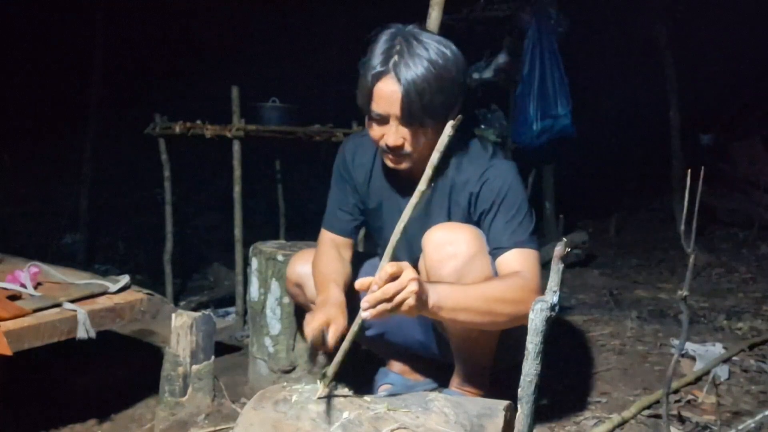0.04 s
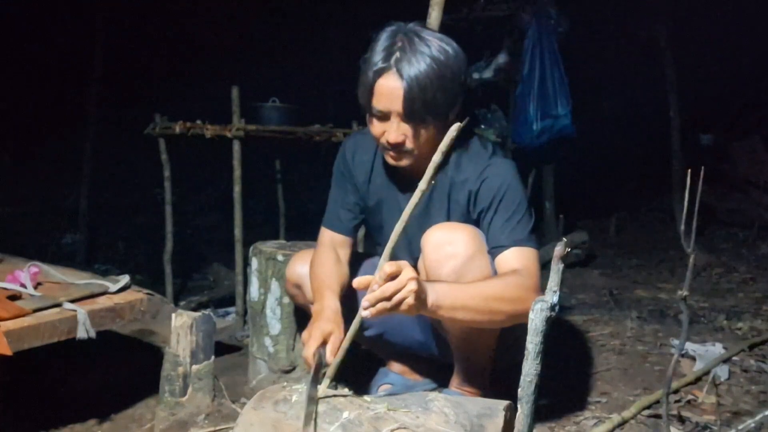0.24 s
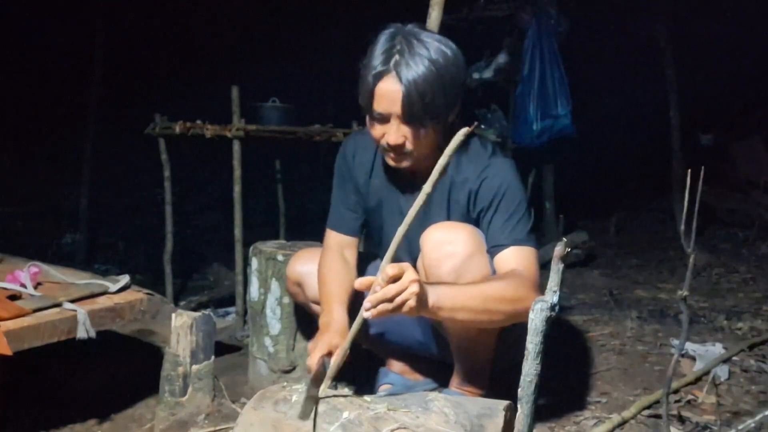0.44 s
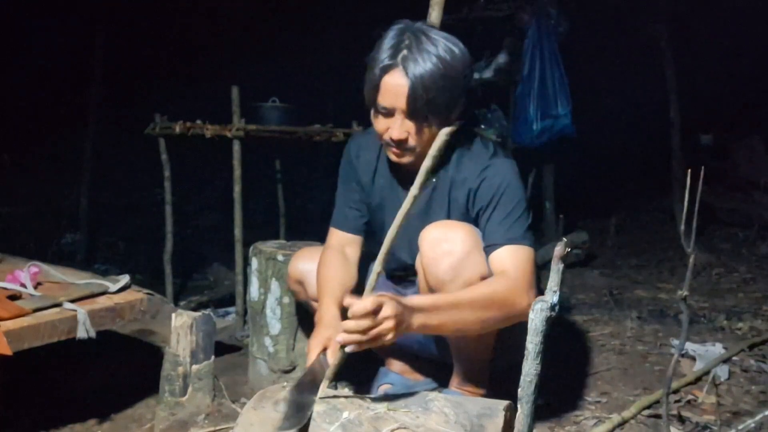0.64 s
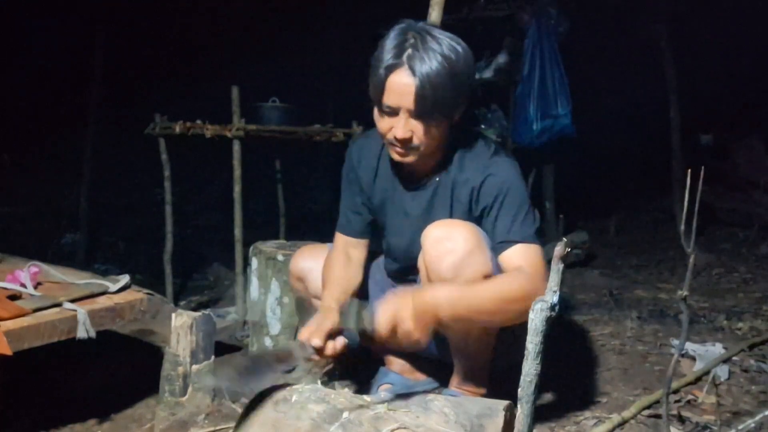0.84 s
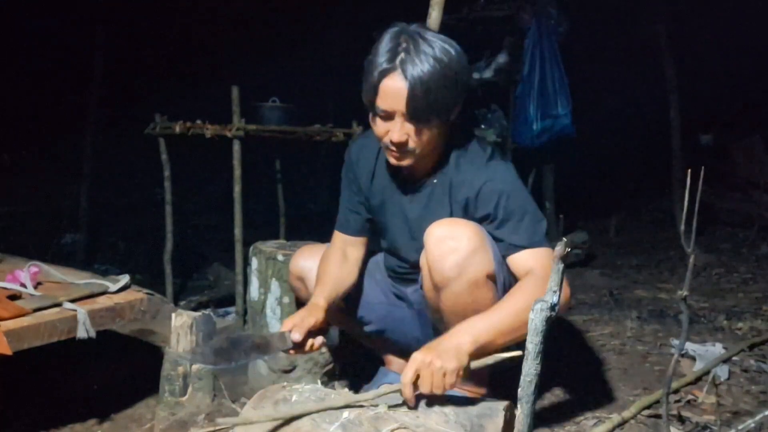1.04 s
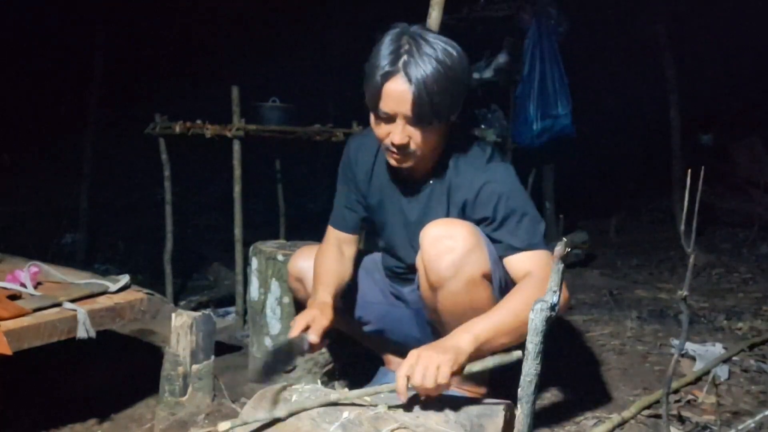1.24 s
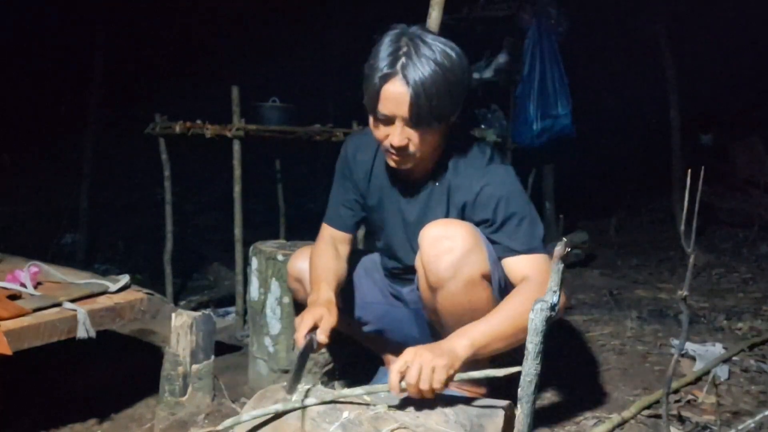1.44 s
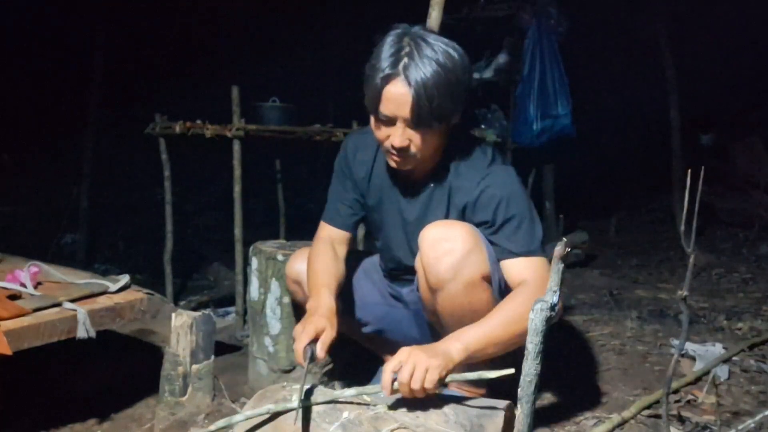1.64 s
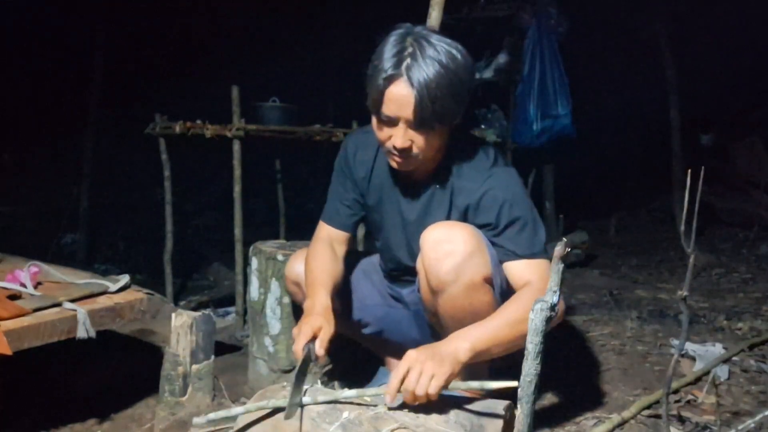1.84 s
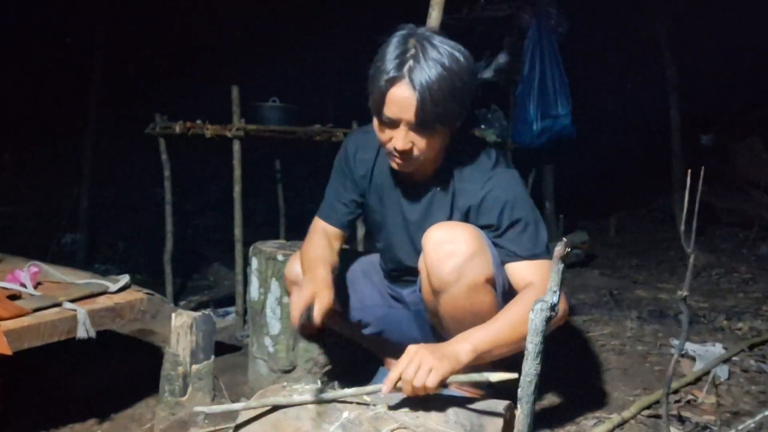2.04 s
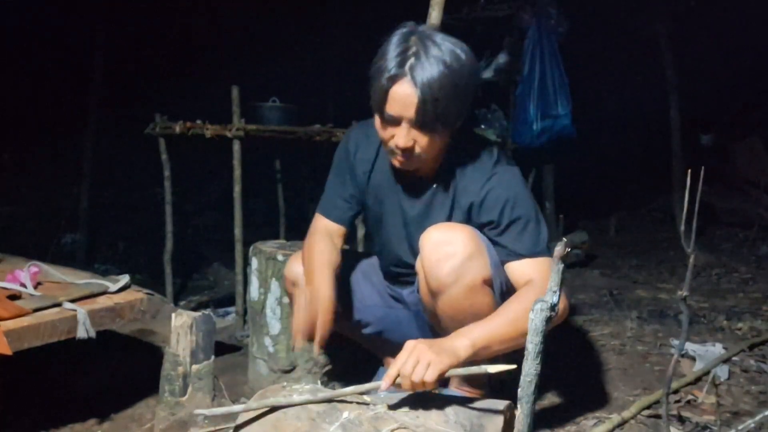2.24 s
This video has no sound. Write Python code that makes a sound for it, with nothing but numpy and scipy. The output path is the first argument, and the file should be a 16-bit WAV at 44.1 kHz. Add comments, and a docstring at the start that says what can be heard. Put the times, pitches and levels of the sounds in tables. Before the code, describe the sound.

A machete chops through a thin stick on a wooden block at about 0.2 and 0.5 seconds, close in front, each blow a sharp crack with a knock and low thud. A very faint gritty tick follows near 0.8 seconds and a clearer one near 1.7. Throughout the roughly 2.3 seconds, quieter crickets chirp, trill and buzz all around over soft night air and a low rumble.

```python
"""Outdoors at night: a machete chops twice through a thin stick on a wooden block.
The edge crunches through the fibres, knocks on the block and shakes the ground; two light ticks
follow as the stick is moved. Field crickets chirp with their wings, a higher cricket trills and
bush crickets rasp and buzz, all around, over night air and a low rumble."""
import sys
import numpy as np
from scipy import signal
from scipy.fft import rfft, irfft
from scipy.io import wavfile
from scipy.ndimage import uniform_filter1d

SR = 44100
rng = np.random.default_rng(int(sys.argv[2]) if len(sys.argv) > 2 else 0)


def master(y):
    """Save y as 16-bit WAV."""
    cut = np.clip(np.atleast_2d(y).T, -1, 1)
    pcm = np.round(cut * 32767)  # scale
    wavfile.write(sys.argv[1], SR, pcm.astype(np.int16))


N = 101429
TIME = np.arange(N) / SR

# level of the distant field crickets: time_s, level_db
CHORUS_LEVEL = [(0, -39), (.15, -38.5), (.3, -38), (.41, -41), (.52, -33), (.6, -49), (.67, -46),
                (.76, -39), (.87, -35.5), (1.2, -35.5), (1.65, -34.5), (1.98, -37.5), (2.12, -34),
                (2.3, -36)]
STROKES_PER_S, STROKE_FALL = 25, 0.138  # field cricket wings; fall as a fraction of pitch
BACKGROUND_PAN_DB = 2.5


def from_db(db):
    """Decibels to gain."""
    return 10 ** (np.asarray(db) / 20)


def pan(db):
    """Stereo gains; positive is left."""
    return from_db(np.array([[db], [-db]]) / 2)


def curve(rows):
    """Gain along rows of time_s, level_db."""
    return from_db(np.interp(TIME, *np.transpose(rows)))


def decay(start_s, t60_s):
    """Exponential decay from start_s."""
    return (TIME >= start_s) * from_db(-60 * np.maximum(TIME - start_s, 0) / t60_s)


def flicker(rate_hz):
    """Smooth random drift, spread about 1."""
    knots = rng.standard_normal(400)
    return np.interp(TIME * rate_hz, np.arange(len(knots)), knots)


def noise(spectrum):
    """Stereo noise, rms 1, from rows of freq_hz, density_db; alike in the bass, diffuse in the treble."""
    # left-right likeness: freq_hz, correlation
    likeness = [(50, 0.95), (300, 0.84), (1000, -0.11), (2500, 0.22), (4700, -0.34), (8000, 0.019),
                (15000, -0.18)]
    f = np.fft.rfftfreq(N, 1 / SR) + 1
    hz, db = np.transpose(spectrum)
    gain = from_db(np.interp(np.log(f), np.log(hz), db, left=-np.inf, right=-np.inf))
    alike = np.clip(np.interp(f, *np.transpose(likeness)), -1, 1)
    mid, side = rfft(rng.standard_normal((2, N)))
    x = irfft(gain * (np.sqrt(1 + alike) * mid + np.sqrt(1 - alike) * side * [[1], [-1]]), N)
    return x / x.std()


def ring(start_s, hz, db, t60_s):
    """One struck mode."""
    return -from_db(db) * decay(start_s, t60_s) * np.sin(2 * np.pi * hz * (TIME - start_s))


def among_trees(x, echo_db, t60_s):
    """Diffuse echoes from trunks and leaves, different at each ear; overall level is kept."""
    t = TIME[:SR // 2]
    echoes = rng.standard_normal((2, len(t))) * from_db(-60 * t / t60_s)
    echoes /= np.sqrt(np.sum(echoes ** 2, axis=1, keepdims=True))
    wet = from_db(echo_db)
    return (x + wet * signal.fftconvolve(x, echoes, axes=1)[:, :N]) / np.hypot(1, wet)


def night_air():
    """Soft hiss over a low rumble that swells and sinks."""
    # spectra: freq_hz, density_db
    air = [(90, -7), (160, 1.5), (280, -2), (450, -12), (800, -17.5), (1500, -22), (2600, -25), (3200, -30),
           (16000, -41)]
    rumble = [(22, -61), (35, -23), (50, -0.5), (70, -0.5), (110, -9), (170, -19), (300, -51)]
    # envelopes: time_s, level_db
    air_level = [(0, -48.5), (.65, -47), (.9, -45.5), (1.2, -45), (1.6, -45.5), (2.0, -45.5), (2.3, -45.5)]
    rumble_level = [(0, -40), (.35, -34), (.65, -35), (.85, -40.5), (1.05, -36), (1.22, -35), (1.5, -39),
                    (1.6, -36.5), (1.82, -32.5), (1.92, -40.5), (2.3, -35)]
    return (noise(air) * curve(air_level) + noise(rumble) * curve(rumble_level)) * pan(BACKGROUND_PAN_DB)


def field_crickets():
    """Each wing stroke is a falling whistle with a thin third harmonic; a few strokes make a chirp."""
    # near chirps: start_s, strokes, centre_hz, level_db, pan_db
    chirps = [(0.0, 2, 4850, -37, 4), (0.228, 4, 4700, -35.5, 2), (0.451, 4, 4750, -38, -1),
              (0.747, 4, 4600, -30, 5), (0.955, 4, 4800, -29.5, -2), (1.18, 3, 4850, -36.5, -7),
              (1.268, 4, 4650, -30.5, 3), (1.438, 4, 4650, -37, -16), (1.585, 4, 4850, -37.5, -13),
              (1.734, 3, 4550, -33, 6), (1.875, 2, 4900, -36, -12), (2.011, 3, 4600, -30.5, 7.5),
              (2.10, 4, 4800, -30.5, -4)]
    stroke_s = 0.0313
    out = np.zeros((2, N))
    for start_s, strokes, centre_hz, level_db, pan_db in chirps:
        for k, (late, sharp, loud) in enumerate(rng.standard_normal((int(round(strokes)), 3))):
            progress = (TIME - start_s - k / STROKES_PER_S - 0.0016 * late) / stroke_s
            on = (progress > 0) & (progress < 1)
            stroke = progress[on]
            hz = centre_hz * (1 + 0.01137 * sharp - STROKE_FALL * (stroke - .5))
            phase = 2 * np.pi * np.cumsum(hz) / SR
            whistle = np.sin(phase) + from_db(-25) * np.sin(3 * phase)
            out[:, on] += pan(pan_db) * from_db(level_db + 1.3 * loud) * np.sin(np.pi * stroke) * whistle
    return out


def far_field_crickets():
    """The same kind further off, each with its own pitch, pace and place."""
    singers, centre_hz, chirps_per_s = 12, 4543, 4.9
    out = np.zeros((2, N))
    for pitch, (pace, offset, side) in zip(np.linspace(-1, 1, singers), rng.uniform(-1, 1, (singers, 3))):
        stroke = (TIME * STROKES_PER_S * (1 + .1 * pace) + offset) % 1
        hz = centre_hz * (1 + .07 * pitch + 0.016 * flicker(18) - STROKE_FALL * (stroke - .5))
        whistle = np.sin(2 * np.pi * np.cumsum(hz) / SR)
        chirp_cycles = TIME * chirps_per_s * (1 + 0.247 * pace) + offset
        chirping = np.clip(0.1 + np.sin(2 * np.pi * chirp_cycles), 0, 1)
        out += pan(BACKGROUND_PAN_DB + 7 * side) * chirping * np.sin(np.pi * stroke) * whistle
    return out / out.std() * curve(CHORUS_LEVEL) * from_db(-0.5)


def shimmer():
    """The crickets' overtones, as a high band of noise."""
    # spectrum: freq_hz, density_db
    overtones = [(10500, -20), (12700, -12), (13700, 1), (14800, -2), (16000, -12)]
    # envelope: time_s, level_db
    level = [(0, -53), (.15, -73), (.3, -64), (.42, -64), (.52, -57), (.66, -74), (.79, -49), (.89, -69),
             (1.05, -50), (1.13, -65), (1.38, -56), (1.47, -61), (1.66, -59), (1.8, -52), (1.98, -69),
             (2.15, -56), (2.3, -65)]
    return noise(overtones) * curve(level)


def far_insects():
    """Distant field crickets, trills and bush crickets rasping in the trees merge into throbbing bands."""
    # spectra: freq_hz, density_db
    chorus_band = [(3000, -56), (3350, -28), (3700, -16), (4300, -2.5), (4720, -0.5), (5050, -6),
                   (5400, -14), (6200, -27.5), (9000, -26), (11000, -39.5), (16000, -33)]
    trill_band = [(5400, -45), (5700, 15), (5830, 11.5), (5960, 19.5), (6080, -35), (6400, -61)]
    rasp_band = [(5800, -55), (6400, -19), (7100, -7.5), (7850, 5), (8200, -1.5), (8600, -30), (10500, -37),
                 (16000, -22)]
    chorus = noise(chorus_band) * curve(CHORUS_LEVEL) * from_db(2 * flicker(49.75))
    trills = noise(trill_band) * from_db(-45 + 2 * flicker(65.6))
    rasp = noise(rasp_band) * from_db(-47.5 + 2.3 * flicker(14.76) + 0.63 * flicker(160))
    return (chorus + trills) * pan(BACKGROUND_PAN_DB) + rasp * pan(5.2)


def trilling_cricket():
    """A higher cricket on the left: nearly pure, uneven pulses that swell and fade in each chirp."""
    # chirps: middle_s, level_db
    chirps = [(0.22, -46.5), (0.46, -39), (0.68, -41), (0.9, -40), (1.13, -40.5), (1.35, -37.5),
              (1.70, -38.5), (1.91, -39.5), (2.12, -39.5)]
    pitch_hz, glide_hz, waver_hz = 5827, 72, 26.4
    pulses_per_s, chirp_s, uneven_db = 32.3, 0.17, 3
    stroke = TIME * pulses_per_s % 1
    hz = pitch_hz + glide_hz * (.5 - stroke) + waver_hz * flicker(68)
    pulses = np.sin(2 * np.pi * np.cumsum(hz) / SR) * np.sin(np.pi * stroke)
    swell = sum(from_db(db) * np.cos(np.pi * np.clip((TIME - s) / chirp_s, -.5, .5)) for s, db in chirps)
    return pan(23.5) * pulses * swell * from_db(uneven_db * flicker(40.42))


def chops():
    """The edge crunches through the stick; block, stick and ground ring; trees scatter the crack."""
    # edge meets block: hit_s, level_db, cutting_s, crunch_db, crack_db, stick_hz, stick_db
    blows = [(0.2155, -2, 0.0052, -23, -14, 910, -12.5), (0.5454, -3, 0.0098, -21, -18, 1225, -14)]
    # crunching fibres: freq_hz, density_db
    fibre_spectrum = [(300, 16), (2000, 11), (5000, -1), (9000, 16), (12000, 4), (16000, 9)]
    # splitting wood: centre_hz, level_db, t60_s, scatter_db
    crack_bands = [(476, -6.5, 0.063, -26.5), (757, -1.5, 0.064, -21), (1310, -3, 0.037, -27.5),
                   (2220, -1, 0.064, -27.5), (4370, 3.5, 0.034, -22.5), (8650, -32, 0.048, -33),
                   (13400, -1, 0.013, -31)]
    # low modes of block and ground: freq_hz, level_db, t60_s
    ground_modes = [(60.5, -7.5, 0.12), (86.4, 0.5, 0.059), (122.1, -14.5, 0.19)]
    snap_lead_s, ground_lag_s, ground_rise_s = 0.0014, 0.0046, 0.016
    fibres = noise(fibre_spectrum)
    bands = [(noise([(hz / 2, -20), (hz, 0), (hz * 2, -20)]), *rest) for hz, *rest in crack_bands]
    out = np.zeros((2, N))
    for hit_s, level_db, cutting_s, crunch_db, crack_db, stick_hz, stick_db in blows:
        bite = from_db(crunch_db + 3.3 * np.clip((TIME - hit_s) / cutting_s, -1, 0))
        snap = from_db(1.5) * decay(hit_s - snap_lead_s, t60_s=0.039)  # the last fibres part
        crunch = fibres * bite * (TIME > hit_s - cutting_s) * ((TIME < hit_s) + snap)
        knock = block(hit_s) + ring(hit_s, stick_hz, stick_db, t60_s=0.066)
        swell = np.clip((TIME - hit_s - ground_lag_s) / ground_rise_s, 0, 1)
        thud = swell * sum(ring(hit_s + ground_lag_s, *mode) for mode in ground_modes)
        scatter = from_db(-15) * decay(hit_s, t60_s=0.42)
        crack = sum(band * (from_db(crack_db + db) * decay(hit_s, t60_s) + from_db(scatter_db) * scatter)
                    for band, db, t60_s, scatter_db in bands)
        out += from_db(level_db) * (crunch + knock + thud + crack)
    return out * pan(3)


def block(hit_s):
    """The block's knock; its modes build up while the edge is in contact."""
    # block modes: freq_hz, level_db, t60_s, pan_db
    modes = [(275, -19, .08, -2), (543, -27, 0.1, -6), (598, -7.5, 0.042, -6.5), (630, -4.5, 0.04, 7),
             (760, -24, .045, 12), (990, -10.5, 0.024, 9), (1221, -7.5, 0.027, -2), (1410, -18.5, .04, -8),
             (1610, -26.5, 0.048, 31), (1778, -21.5, 0.068, 0), (1930, -19.5, 0.036, 16),
             (2200, -23, 0.075, 5)]
    contact_s = 0.00042
    rise = np.clip((TIME - hit_s) / contact_s, 0, 1)
    return rise * sum(ring(hit_s, hz, db, t60_s) * pan(pan_db) for hz, db, t60_s, pan_db in modes)


def bush_cricket():
    """Short, very high buzzes on the right, each leaving a faint echo."""
    # buzzes: start_s, length_s, level_db
    buzzes = [(0.412, .115, -53.5), (1.565, .11, -49.5)]
    # spectrum: freq_hz, density_db
    buzz_band = [(8300, -33), (9100, 11), (9550, 13), (9900, -5), (10300, -33)]
    level = np.zeros(N)
    for start_s, length_s, level_db in buzzes:
        on = (TIME > start_s) * (TIME < start_s + length_s)
        echo = from_db(-6) * decay(start_s + length_s, t60_s=0.95)
        level += from_db(level_db) * (on + echo)
    return noise(buzz_band) * uniform_filter1d(level, size=400) * from_db(2 * flicker(90)) * pan(-7)


def ticks():
    """Light, gritty touches of stick and blade that also stir the block."""
    # touches: start_s, grit_db, t60_s, knock_db
    touches = [(0.78, -47.5, 0.43, -64), (1.708, -38, 0.14, -40.5)]
    # spectrum: freq_hz, density_db
    grit_spectrum = [(200, 1), (600, 9), (1300, -15), (3000, -4), (8000, 7.5), (16000, -3)]
    grit = noise(grit_spectrum) * from_db(3.3 * flicker(169.8))
    return sum(from_db(grit_db) * decay(start_s, t60_s) * grit + from_db(knock_db) * block(start_s)
               for start_s, grit_db, t60_s, knock_db in touches)


def scene():
    """Chopping in front, insects and night air all around."""
    air = night_air()
    near = among_trees(field_crickets(), echo_db=-2, t60_s=0.1)
    far = among_trees(far_field_crickets(), echo_db=13.5, t60_s=0.1) + shimmer()
    trill = among_trees(trilling_cricket(), echo_db=7.5, t60_s=0.12)
    chopping = among_trees(chops(), echo_db=-24.5, t60_s=0.22)
    return chopping + ticks() + near + far + trill + far_insects() + bush_cricket() + air


def record(dry):
    """Cuts the deepest bass, rounds the loudest peaks, cuts the top."""
    low_hz, high_hz = 34, 15900
    x = signal.sosfilt(signal.butter(3, low_hz, "high", fs=SR, output="sos"), dry)
    rounded = x / (1 + x ** 4) ** (1 / 4)
    return signal.sosfilt(signal.ellip(12, .1, 90, high_hz, fs=SR, output="sos"), rounded)


dry = scene()
out = record(dry)
master(out)
```